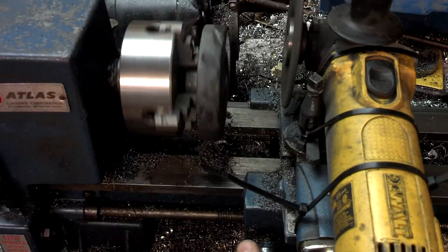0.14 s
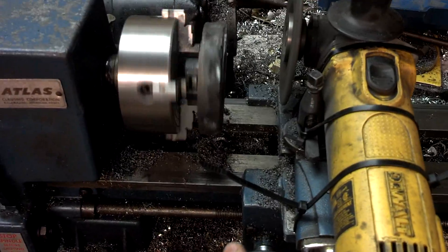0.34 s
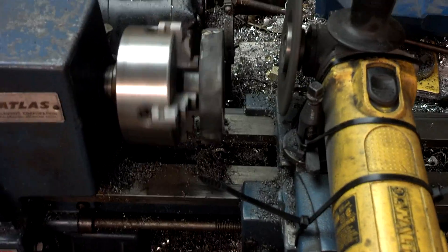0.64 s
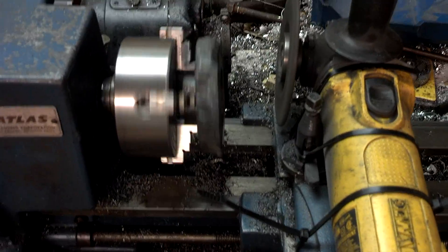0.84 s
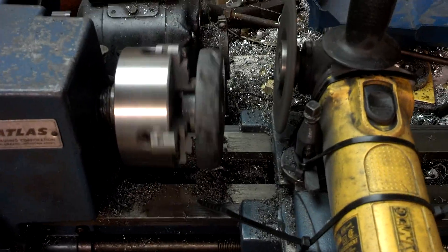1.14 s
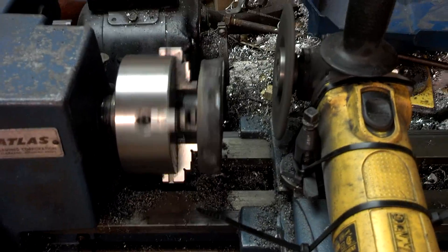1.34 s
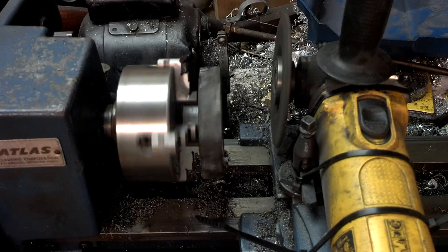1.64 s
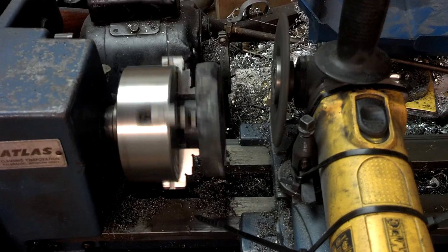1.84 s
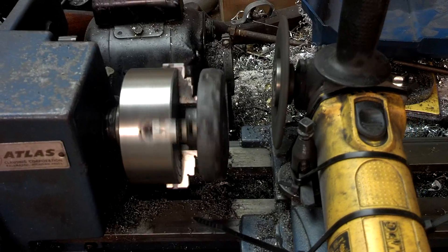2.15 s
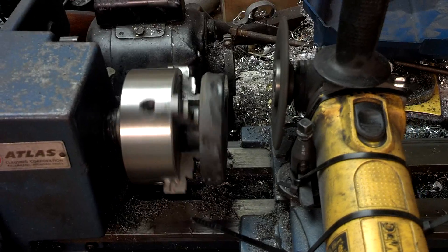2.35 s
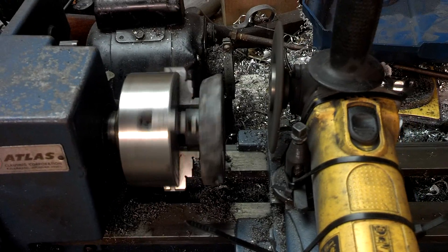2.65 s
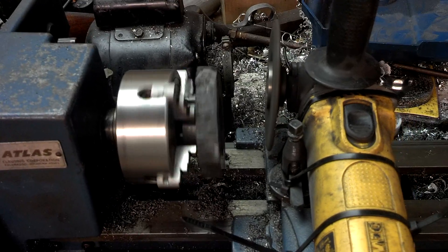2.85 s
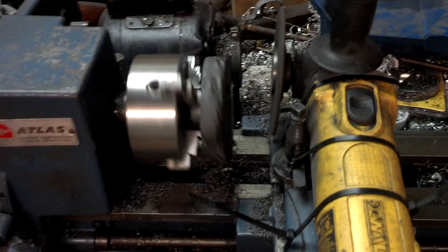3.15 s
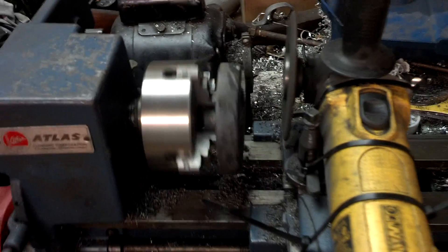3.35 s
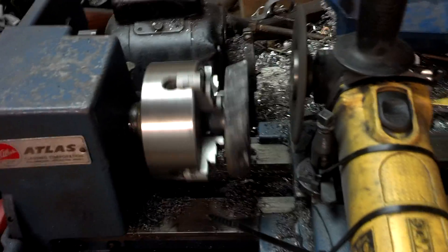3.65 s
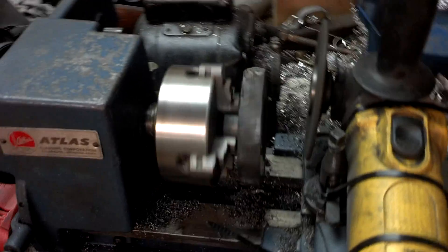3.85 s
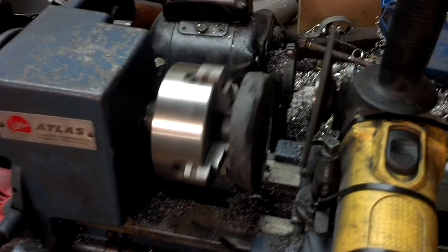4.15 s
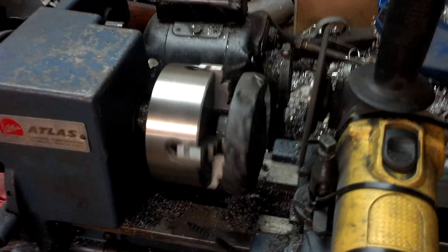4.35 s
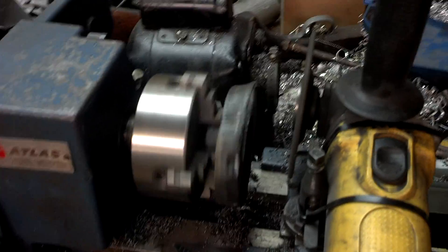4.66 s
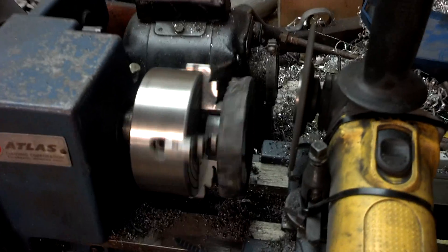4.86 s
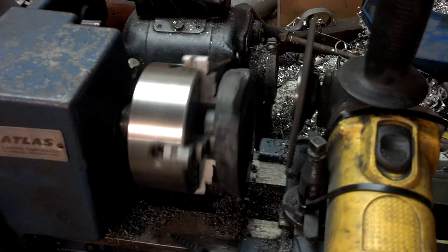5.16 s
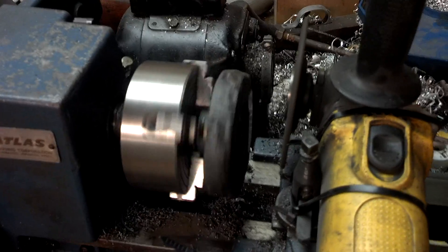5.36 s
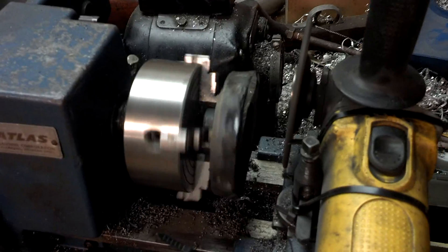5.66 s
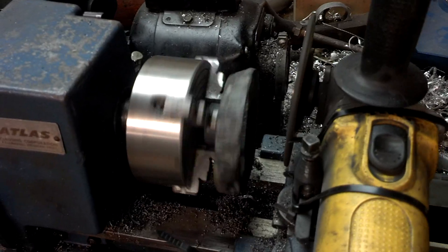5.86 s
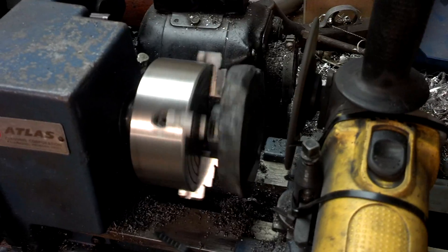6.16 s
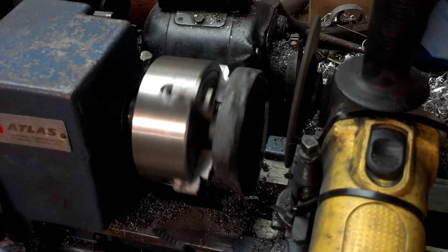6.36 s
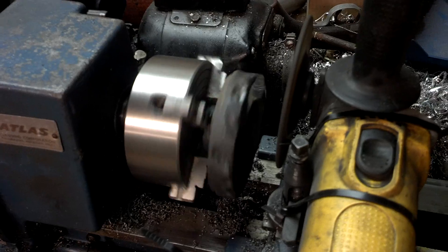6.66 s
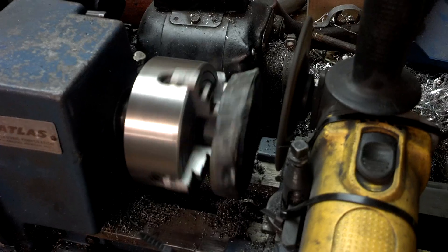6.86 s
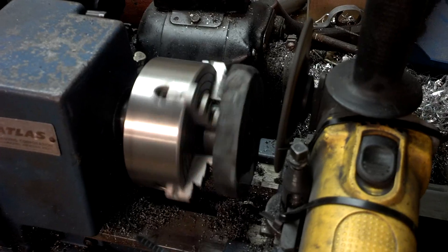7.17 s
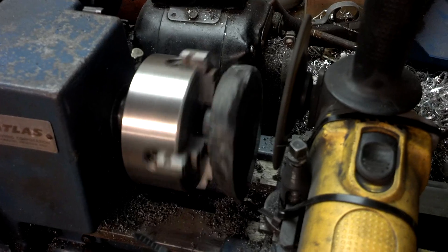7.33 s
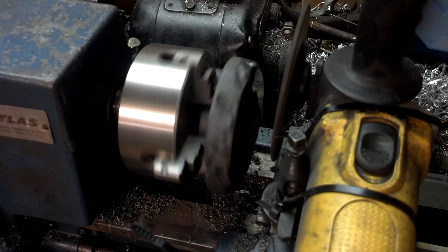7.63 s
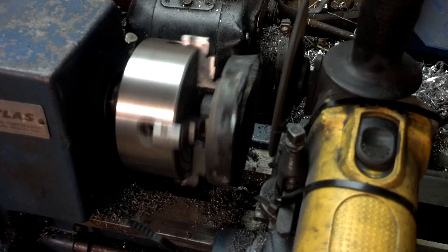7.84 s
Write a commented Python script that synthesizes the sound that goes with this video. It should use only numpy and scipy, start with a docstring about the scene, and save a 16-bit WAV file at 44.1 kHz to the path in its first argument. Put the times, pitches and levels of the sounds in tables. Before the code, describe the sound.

Close, harsh power-tool roar: constant fan rush and high motor whine, with erratic metallic gear chatter above a faint lathe motor drone.

```python
"""Angle grinder on a lathe

An angle grinder clamped to a small lathe runs at full speed in a home workshop, close to a phone.
Its bevel gears chatter in spells: impact envelopes drive a mesh tone and the noise of a ringing gear head.
Its fan rushes as coloured noise that flutters with the wheel; its armature whines in multiples of its turn.
The lathe motor drones underneath: a mains harmonic and a narrow band of noise."""
import sys
import numpy as np
from scipy import signal
from scipy.fft import rfft, irfft
from scipy.io import wavfile
from scipy.ndimage import uniform_filter1d

SR = 44100
rng = np.random.default_rng(int(sys.argv[2]) if len(sys.argv) > 2 else 0)


def wav_record(signal):
    """Record a signal, one row per channel, as 16-bit PCM in the file named by sys.argv[1]."""
    frames = np.transpose(np.atleast_2d(signal))
    bounded = np.clip(frames, -1, 1)
    # unit amplitude maps onto the largest positive 16-bit level
    quanta = np.round(bounded * 32767).astype(np.int16)
    wavfile.write(sys.argv[1], SR, quanta)


N = 352800
TIME = np.arange(N) / SR  # s
FREQ = np.arange(N // 2 + 1) * SR / N  # Hz

PINION_TEETH, CROWN_TEETH = 11, 36
MAINS_HZ = 60
# lag between the phone's two ports, and the frequency from which it acts
PORT_LAG_S, PORT_FROM_HZ = .0003855, 1297


def chatter(wheel):
    """Impact excitation: each bounce is a short run of tooth strikes, a mesh tone and a ringing gear head."""
    # spectrum of the struck gear head: [f/Hz, relative density level/dB]
    head_outline = [(150, -50), (500, -28.5), (3000, -24), (4200, -7), (5200, -5.5), (5800, -4), (6200, 8),
                    (6500, 3.5), (6760, 10), (6920, -9), (7200, -0.5), (7600, -30), (9000, -10.5),
                    (13000, -21), (15500, -20)]
    # its narrow rings: [f/Hz, width/Hz, lift/dB]
    head_modes = [(1776, 200, 15), (5850, 40, 4), (6060, 110, -2.5), (6345, 50, 3), (6460, 25, 4),
                  (6517, 32, 4), (6720, 40, 3), (6830, 26, 4), (7000, 40, -4), (7110, 80, 3)]
    # mesh tone: [t/s, level against the ringing/dB, phase swing from the mains' torque ripple/rad]
    mesh_course = [(0, 2.5, 1.2), (3.7, -3, 1.4), (4.0, 6.5, 1.2), (5, 4, 1.1), (7, 9.5, .7), (8, -4, .8)]
    # settings of two ring bands: [t/s, lower band lift/dB, upper band lift/dB]
    ring_course = [(0, 1, 7), (.8, 3, 0), (1.3, 5, -15), (3.6, 8, -2), (4.0, -2, 12), (5, -3, 9.5),
                   (6.5, -1, 13.5), (7.4, -8, 10), (8, 0, 4)]
    gain = colour(head_outline, head_modes)
    mesh_db, ripple_rad = curves(mesh_course)
    lower_db, upper_db = curves(ring_course)

    ring = noise_at_ports(gain, opposite_db=-4.5, diffuse_db=-14, bass_diffuse_db=5.0)
    ring = swell(ring, 6100, 6420, lower_db)
    ring = swell(ring, 6670, 6980, upper_db)
    head = ring + undb(mesh_db) * mesh_tone(wheel, ripple_rad, wobble_rad=0.44)
    # level the carrier over about 3 ms, so that the bounce alone sets the strength
    power = uniform_filter1d(np.mean(head ** 2, axis=0), size=130)
    head = head / np.sqrt(power)

    strength = rattle(wheel, gap_s=.0048, scatter_db=2.5, ceiling=1.13)
    direct = undb(-0.85) * strength * head
    return direct + workshop(strength, gain, t60_s=0.12, wet_db=-11.0)


def rattle(wheel, gap_s, scatter_db, ceiling):
    """Backlash impacts: teeth bounce through their play, pushed by wheel wobble and mains torque ripple."""
    # the hardest single knocks: [t/s, peak level/dB before the chatter's direct gain]
    hard_knocks = [(0.3721, -7.5), (0.5098, -7.5), (0.5831, -8.0), (0.6324, -7.0), (0.6432, -7.5),
                   (0.692, -8.0), (0.7299, -8.0), (0.7898, -7.0), (0.8005, -6.5), (0.8335, -7.0),
                   (0.9251, -7.5), (1.0064, -8.0), (1.0502, -7.5), (1.0822, -7.5), (1.0886, -6.5),
                   (1.0977, -5.0), (1.1206, -6.5), (1.1307, -5.5), (1.3651, -6.5), (1.3754, -7.5),
                   (1.5325, -7.5), (1.8224, -8.0), (1.8741, -6.5), (1.8986, -7.0), (1.9216, -7.0),
                   (2.2644, -7.0), (2.3807, -8.0), (2.4758, -8.0), (2.4917, -8.0), (2.6797, -7.0),
                   (2.7196, -6.5), (2.7407, -8.0), (2.8139, -7.5), (2.8811, -8.0), (2.9131, -8.5),
                   (3.0141, -7.0), (3.1148, -7.0), (3.3557, -7.0), (3.4125, -5.0), (3.4886, -8.0),
                   (3.5051, -7.5), (3.5154, -6.0), (4.0454, -7.0), (4.0721, -4.5), (4.1969, -6.0),
                   (4.224, -5.5), (4.2625, -5.5), (4.2724, -6.0), (4.3217, -7.5), (4.3944, -6.5),
                   (4.6948, -5.5), (4.8034, -5.0), (4.83, -6.5), (4.8894, -7.0), (4.9058, -8.0),
                   (4.987, -6.0), (5.0005, -7.5), (5.0219, -7.5), (5.0761, -5.5), (5.1709, -8.0),
                   (5.2331, -7.0), (5.2494, -7.0), (5.3143, -5.5), (5.4335, -4.5), (5.4601, -6.5),
                   (5.4792, -6.0), (5.5743, -5.0), (5.7724, -8.0), (5.7848, -7.0), (5.872, -6.5),
                   (6.0375, -7.0), (6.0478, -5.5), (6.0862, -8.5), (6.1151, -7.0), (6.1556, -5.5),
                   (6.2053, -5.0), (6.2215, -6.0), (6.2385, -6.5), (6.324, -8.5), (6.4077, -8.0),
                   (6.4397, -7.0), (6.4884, -5.5), (6.5132, -6.0), (6.548, -5.5), (6.5596, -5.5),
                   (6.6889, -6.0), (6.7322, -5.5), (6.8122, -5.0), (6.822, -6.0), (6.838, -4.0),
                   (6.8556, -5.0), (6.8708, -6.0), (6.9636, -6.5), (6.9963, -6.5), (7.1051, -7.5),
                   (7.1674, -6.0), (7.1797, -4.5), (7.1886, -6.5), (7.216, -6.0), (7.2655, -7.5),
                   (7.2921, -7.0), (7.352, -8.5), (7.4924, -7.5), (7.6338, -8.5), (7.9707, -7.5),
                   (7.9798, -5.5)]
    crest_db = 4.2  # a knock's peak above the rms of its ringing
    flight_s = 0.008  # the teeth fly free this long before a hard knock

    chance = rng.standard_normal((4000, 2))
    times = np.cumsum(gap_s * np.exp(.35 * chance[:, 0]))
    sizes = undb(scatter_db * np.tanh(chance[:, 1]))
    bounces = knocks(times, sizes, ring_s=0.0014)
    ripple = np.cos(4 * np.pi * MAINS_HZ * TIME)  # torque pulses at twice the mains
    push = np.exp(.2 * np.cos(wheel) + .22 * np.cos(2 * wheel) + .18 * ripple)
    bouncing = np.tanh(unit((unit(bounces) + 0.23) * push) / ceiling)  # backlash limits an ordinary bounce
    strength = undb(spells() + 1.8) * unit(bouncing)

    s, peak_db = np.transpose(hard_knocks)
    flight = sum(window(at - flight_s / 2, flight_s) for at in s)
    strength = strength * (1 - np.clip(flight, 0, .6))
    hard = knocks(s + .001, undb(peak_db - crest_db), ring_s=0.0013)  # each peaks 1 ms after its listed time
    return np.maximum(strength, hard)


def spells():
    """Intermittent contact, as a level in dB: a restless light rattle, broken by lulls and loud spells."""
    # lulls in which the teeth stay in contact: [middle t/s, length/s]
    quiet_spans = [(0.253, 0.066), (0.854, 0.027), (1.35, 0.029), (1.73, 0.12), (2.162, 0.071),
                   (2.638, 0.045), (2.78, 0.041), (3.24, 0.061), (3.838, 0.13), (4.786, 0.029),
                   (4.974, 0.021), (6.383, 0.028), (6.772, 0.028), (6.935, 0.024), (7.682, 0.082)]
    # the loudest spells: [middle t/s, length/s, relative level/dB]
    loud_spans = [(0.082, 0.1, -20), (0.166, 0.02, -16), (0.316, 0.043, -19), (0.49, 0.26, -19),
                  (0.638, 0.016, -15.5), (0.725, 0.081, -18.5), (0.813, 0.068, -22), (0.916, 0.048, -18.5),
                  (1.019, 0.014, -15.5), (1.062, 0.034, -19.5), (1.105, 0.06, -15), (1.186, 0.073, -20.5),
                  (1.425, 0.093, -20.5), (1.518, 0.032, -17), (1.62, 0.054, -18.5), (1.724, 0.018, -17.5),
                  (1.804, 0.052, -18.0), (1.882, 0.056, -16.5), (1.924, 0.016, -19), (1.998, 0.018, -20.0),
                  (2.037, 0.012, -16.5), (2.079, 0.014, -16.5), (2.206, 0.022, -19), (2.28, 0.035, -21),
                  (2.424, 0.19, -21), (2.71, 0.071, -17), (2.804, 0.03, -20), (2.851, 0.021, -17.5),
                  (2.93, 0.11, -18.5), (3.017, 0.017, -16.5), (3.107, 0.036, -19), (3.351, 0.02, -13.5),
                  (3.408, 0.022, -12), (3.46, 0.098, -21.5), (3.506, 0.018, -15), (3.922, 0.042, -21),
                  (3.997, 0.053, -15.5), (4.063, 0.033, -17.5), (4.151, 0.019, -16.5),
                  (4.212, 0.039, -15.5), (4.27, 0.014, -10), (4.293, 0.017, -20), (4.389, 0.045, -17.5),
                  (4.468, 0.033, -16.5), (4.587, 0.014, -17.5), (4.64, 0.048, -17), (4.705, 0.027, -16.5),
                  (4.826, 0.065, -18), (4.899, 0.041, -17), (4.993, 0.022, -12), (5.054, 0.068, -17.0),
                  (5.185, 0.043, -17.0), (5.241, 0.031, -13), (5.314, 0.055, -16.5), (5.442, 0.074, -15.5),
                  (5.492, 0.058, -17.5), (5.574, 0.019, -10.5), (5.648, 0.028, -18.5), (5.702, 0.018, -17),
                  (5.78, 0.018, -13), (5.88, 0.034, -17), (5.935, 0.049, -18.5), (5.988, 0.035, -17.5),
                  (6.049, 0.032, -11), (6.083, 0.05, -23), (6.138, 0.051, -15.5), (6.2, 0.016, -16),
                  (6.23, 0.072, -14), (6.304, 0.046, -18.5), (6.358, 0.014, -17.5), (6.404, 0.014, -12),
                  (6.446, 0.022, -17.5), (6.51, 0.055, -18), (6.558, 0.021, -12), (6.693, 0.02, -17),
                  (6.733, 0.032, -15.5), (6.801, 0.02, -19), (6.849, 0.098, -14), (6.987, 0.065, -15),
                  (7.05, 0.019, -16), (7.112, 0.018, -16.5), (7.144, 0.034, -19), (7.191, 0.071, -13.5),
                  (7.228, 0.02, -20), (7.263, 0.012, -11), (7.31, 0.052, -17), (7.379, 0.092, -21.5),
                  (7.46, 0.073, -17.5), (7.56, 0.038, -17.5), (7.635, 0.019, -18), (7.73, 0.015, -17),
                  (7.9, 0.012, -16.5), (7.985, 0.029, -15.5)]
    idle_db, restless_db, lull_db = -25, 2.4, -31.5  # light rattle, its rms spread, the lulls
    db = idle_db + restless_db * walk(78)
    for s, length in quiet_spans:
        db = db + (lull_db - db) * window(s, length)
    for s, length, spell_db in loud_spans:
        db = db + (spell_db - db) * window(s, length)
    return db


def mesh_tone(wheel, ripple_rad, wobble_rad):
    """Phase modulation: teeth meet early and late with wobble and torque ripple, so the tone has sidebands."""
    wobble = wobble_rad * (1 + 0.22 * walk(3)) * np.sin(wheel)
    ripple = ripple_rad * (1 + 0.18 * walk(6.3)) * np.cos(4 * np.pi * MAINS_HZ * TIME)
    return np.sin(CROWN_TEETH * wheel + wobble + ripple + 0.19 * walk(29))


def fan(wheel):
    """Turbulent flow noise: air rushes through the housing, fluttering once per turn of the wheel."""
    # rush of the cooling air and the brushes: [f/Hz, relative density level/dB]
    air_outline = [(32, -40), (90, -26), (240, -10.5), (330, -1.5), (700, 0.5), (1400, 4), (2400, 3),
                   (2750, 7), (3200, 8), (3800, 4.5), (4600, 7.5), (5200, 4), (6500, 6), (7500, 1.5),
                   (8200, -2.5), (11500, -6.5), (14300, -9), (15300, -17)]
    # air path and castings: [f/Hz, width/Hz, lift/dB before the phone moves, lift/dB after]
    cavity_modes = [(302, 47, .5, -0.5), (382, 33, -6, -5), (527, 100, 2.5, 1.5), (620, 105, -3, -2.5),
                    (676, 12.5, 8.5, 4.5), (750, 120, -0.5, -1.5), (1063, 77, 2.5, 0), (1142, 65, -5, -3),
                    (1310, 38, 2.5, -1), (1379, 70, -5, -5.5), (1490, 82, -0.5, 1), (1616, 100, -1.5, -4),
                    (1974, 240, 6.5, 3.5), (2240, 170, 3.5, 4.5), (2440, 180, 3, 6), (3190, 160, -5.5, -2),
                    (3570, 51, 4, 4), (3790, 33, 0, 3), (8860, 3100, 5, 4)]
    # low and middle range of the rush: [t/s, level/dB]
    low_course = [(0, -0.1), (1.3, -0.5), (4, -0.3), (5.3, 2.3), (8, 1.1)]
    # rush around 2 kHz: [t/s, level/dB]
    middle_course = [(.6, 0), (1.5, -2.5), (3.2, -1.2), (3.7, 2.5), (4.1, 0), (5.4, 4.5), (6.8, 2.5),
                     (8, 2)]
    # band around 9 kHz: [t/s, level setting/dB]
    treble_course = [(3, 0), (3.8, 11.5), (4.6, -7), (5.5, 2)]
    move_s, move_length_s = 4.42, 0.56  # middle and length of the phone's move

    def rush(lift):
        gain = colour(air_outline, zip(hz, width, lift))
        return noise_at_ports(gain, opposite_db=-2.5, diffuse_db=3, bass_diffuse_db=-2.5)

    hz, width, lift_before, lift_after = np.transpose(cavity_modes)
    before, after = rush(lift_before), rush(lift_after)
    moved = np.clip((TIME - move_s) / move_length_s + .5, 0, 1)
    air = np.sqrt(1 - moved) * before + np.sqrt(moved) * after  # equal-power crossfade
    air = swell(air, 320, 1010, *curves(low_course))
    air = swell(air, 1780, 2180, *curves(middle_course))
    air = moving_resonance(air, width_hz=320, flank=.25)
    air = swell(air, 8950, 9040, *curves(treble_course))
    flutter = 1 + 0.017 * np.cos(wheel)
    return undb(-21.0 + 0.5 * walk(9.6)) * air * flutter


def moving_resonance(x, width_hz, flank):
    """Gliding resonance: fixed bands rise as its centre passes and thin on its flanks, or the reverse."""
    # [t/s, centre f/Hz, lift setting/dB]
    glide = [(0, 4530, 2.5), (.5, 4180, 5.5), (1.2, 3940, 4.5), (1.9, 3750, 5), (2.7, 3780, 4),
             (3.1, 4170, 5.5), (3.45, 4730, 0.5), (3.75, 4150, 5.5), (4.05, 3700, 6), (4.4, 3600, 2.5),
             (4.7, 3500, -1.5), (5.4, 4100, 2), (6.7, 4120, 2.5), (7.3, 3600, 2), (8, 3550, 2.5)]
    centre_hz, lift_db = curves(glide)
    for hz in np.arange(3300, 5000, 200):
        off = ((hz - centre_hz) / width_hz) ** 2
        band_db = lift_db * (1 - flank * off) * np.exp(-off / 2)
        x = swell(x, hz - 100, hz + 100, band_db)
    return x


def whine(armature, wheel):
    """Rotational harmonics: armature, gear mesh and commutator, and the unbalance of the wheel."""
    # [multiple of the armature's turn, level/dB, left minus right/dB, left leads/rad]
    armature_orders = [(1, -48.3, 8, 0), (3, -49, -3, -1), (5, -51.5, 0, .8), (11, -38, -1, 0),
                       (12, -38, -1, -1.5), (24, -51, -1, 0)]
    # [multiple of the wheel's turn, level/dB, left minus right/dB, left leads/rad]
    wheel_orders = [(1, -41, -9, 1), (2, -46.5, 2, 0.33), (3, -50, 1, 0.85), (7, -50, 0, 0)]
    return tones(armature_orders, armature, waver_db=1.0) + tones(wheel_orders, wheel, waver_db=0.3)


def lathe():
    """Mains hum and narrow-band noise: the frame's drone beats quickly but holds its level, stronger right."""
    # motor hum: [multiple of the mains, level/dB, left minus right/dB, left leads/rad]
    hum_orders = [(2, -61.5, 6, 0)]
    # drone of the frame: [f/Hz, relative density level/dB]
    frame_outline = [(80, -50), (140, -16), (158, 3.5), (166, 12.5), (176, 10), (192, -2.5), (212, -7),
                     (230, -30), (250, -51)]
    drone = irfft(rfft(rng.standard_normal(N)) * colour(frame_outline), N)
    drone = drone / np.sqrt(uniform_filter1d(drone ** 2, size=SR // 3))
    hum = tones(hum_orders, 2 * np.pi * MAINS_HZ * TIME, waver_db=2.5)
    return drone * undb([[-53], [-42]]) + hum


def workshop(strength, gain, t60_s, wet_db):
    """Exponential energy decay: the cluttered room keeps a short, blurred tail of every knock."""
    decay = np.exp(-np.log(10 ** 6) * TIME[:SR // 2] / t60_s)
    energy = signal.fftconvolve(strength ** 2, decay / decay.sum())[:N]
    tail = noise_at_ports(gain, opposite_db=-3, diffuse_db=-24, bass_diffuse_db=-13)
    return undb(wet_db) * np.sqrt(abs(energy)) * tail


def noise_at_ports(gain, opposite_db, diffuse_db, bass_diffuse_db):
    """Arrival-time difference: noise direct from the right, reflected from the left, diffuse in bass and treble."""
    direct, opposite, *diffuse = rfft(rng.standard_normal((4, N)))
    side = np.array([[-1], [1]])  # left, right
    turn = np.exp(1j * np.pi * PORT_LAG_S * np.maximum(FREQ - PORT_FROM_HZ, 0) * side)
    treble = undb(diffuse_db) / (1 + (10000 / (FREQ + 1)) ** 8)
    bass = undb(bass_diffuse_db) / (1 + (FREQ / 900) ** 4)
    field = direct * turn + undb(opposite_db) * opposite / turn + (treble + bass) * np.array(diffuse)
    return unit(irfft(gain * field, N))


def tones(table, angle, waver_db):
    """Harmonic series: multiples of a turning angle, each wavering slowly in strength."""
    side = np.array([[.5], [-.5]])  # left, right
    total = 0
    for k, db, pan, lead in table:
        level = undb(db + side * pan + waver_db * walk(5))
        total = total + level * np.sin(round(k) * angle + side * lead)
    return total


def knocks(times, sizes, ring_s):
    """Impulse response: envelopes that peak at the given times and die within a few milliseconds."""
    at = np.maximum((times - ring_s) * SR, 0).astype(int)
    impulses = np.bincount(at[at < N], sizes[at < N], N)
    age = TIME[:SR // 20] / ring_s
    return signal.fftconvolve(impulses, age * np.exp(1 - age))[:N]


def window(middle_s, length_s):
    """Trapezoidal gating: a quick rise to 1, a hold and a quick fall."""
    edge_s = 0.0059
    corners = np.array([-1, -1, 1, 1]) * length_s / 2 + np.array([-1, 1, -1, 1]) * edge_s / 2
    return np.interp(TIME, middle_s + corners, [0, 1, 1, 0])


def colour(points, bumps=()):
    """Spectral envelope: gain at each frequency, a broad outline with resonances on it."""
    hz, db = np.transpose(points)
    outline = np.interp(np.log(FREQ + 1), np.log(hz), db)
    lifts = sum(lift / (1 + (2 * (FREQ - f) / width) ** 4) for f, width, lift in bumps)
    return undb(outline + lifts)


def swell(x, lo_hz, hi_hz, db):
    """Band gain: raise or lower one band along a curve; a narrow band takes only part of the change."""
    band = 1 / (1 + (lo_hz / (FREQ + 1)) ** 40) / (1 + (FREQ / hi_hz) ** 40)
    return x + (undb(db) - 1) * irfft(rfft(x) * band, N)


def walk(rate):
    """Low-passed noise: smooth wandering with a spread of 1, mostly slower than rate in Hz."""
    return unit(irfft(rfft(rng.standard_normal(N)) * np.exp(-(FREQ / rate) ** 2), N))


def curves(table):
    """Linear interpolation: each column of a table of timed rows, joined by straight lines."""
    s, *columns = np.transpose(table)
    return [np.interp(TIME, s, c) for c in columns]


def undb(db):
    """Logarithmic level: decibels to amplitude gain."""
    return 10 ** (np.asarray(db) / 20)


def unit(x):
    """Normalisation: scale to an rms of 1."""
    return x / np.sqrt(np.mean(x ** 2))


def notch_middle(x):
    """Notched middle: what both channels share is thinned in narrow, evenly spaced bands."""
    notch_width = 0.27  # on the scale of the sine below
    middle = x.mean(axis=0)
    spacing = np.sin(np.pi * PORT_LAG_S * FREQ)  # zero at the centre of each band
    bands = np.exp(-(spacing / notch_width) ** 4) * (FREQ > PORT_FROM_HZ) * (FREQ < 9000)
    return x - .9 * irfft(rfft(middle) * bands, N)


def scene():
    """Gear reduction: the armature drives the wheel through bevel gears; the lathe runs alongside."""
    # armature speed: [t/s, turning f/Hz], about which it wanders slightly
    speed_course = [(0, 603.3), (0.35, 603.6), (0.7, 602.2), (1.4, 603.9), (1.9, 603.6), (2.4, 604.2),
                    (3, 603.0), (3.6, 604.8), (4.7, 604.7), (5.4, 604.0), (5.9, 604.9), (6.7, 605.0),
                    (7.4, 603.3), (8, 604.4)]
    speed_hz, = curves(speed_course)
    armature = 2 * np.pi * np.cumsum(speed_hz * (1 + 0.000585 * walk(14.76))) / SR
    wheel = armature * PINION_TEETH / CROWN_TEETH
    return chatter(wheel) + fan(wheel) + whine(armature, wheel) + lathe()


def record(dry):
    """Filtering and limiting: the middle is hollowed, high peaks rounded, deep bass thinned and the top cut."""
    hollowed = notch_middle(dry * undb([[-.2], [.2]]))
    rounded = hollowed / (1 + (hollowed / .8) ** 6) ** (1 / 6)
    thin = signal.sosfilt(signal.butter(2, 50, "highpass", fs=SR, output="sos"), rounded)
    return signal.sosfilt(signal.ellip(10, .1, 80, 15500, fs=SR, output="sos"), thin)


dry = scene()
out = record(dry)
wav_record(out)
```